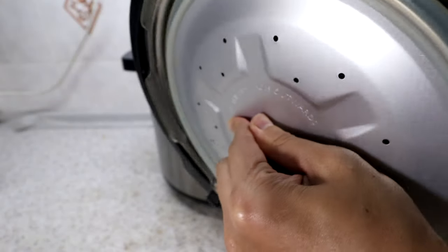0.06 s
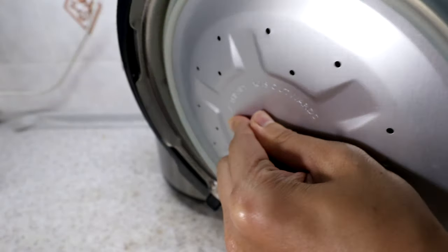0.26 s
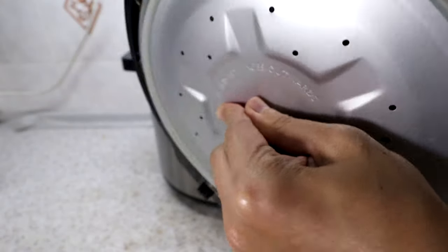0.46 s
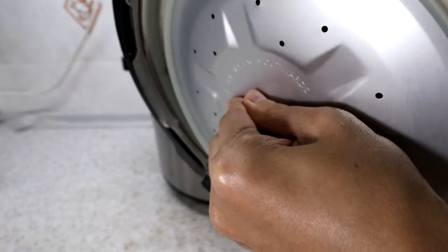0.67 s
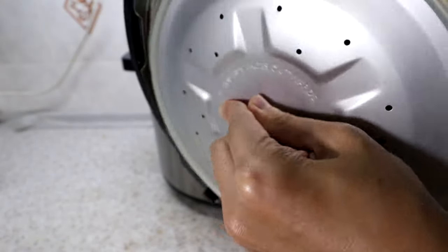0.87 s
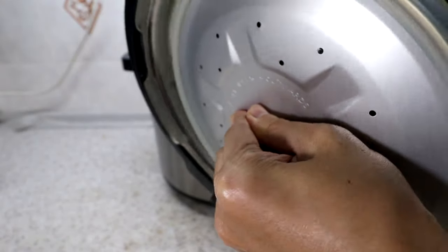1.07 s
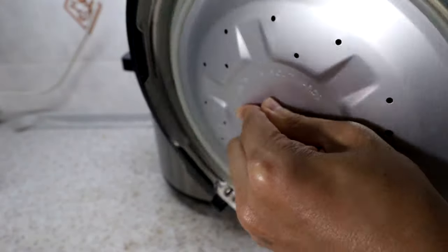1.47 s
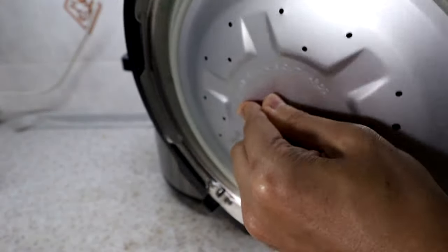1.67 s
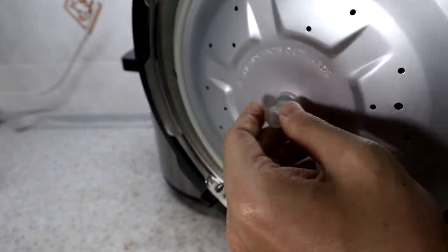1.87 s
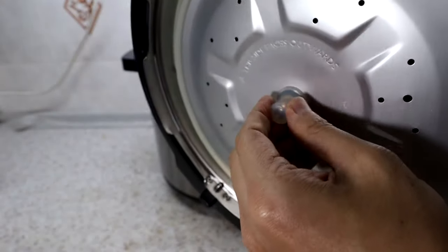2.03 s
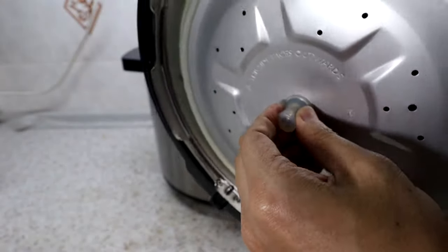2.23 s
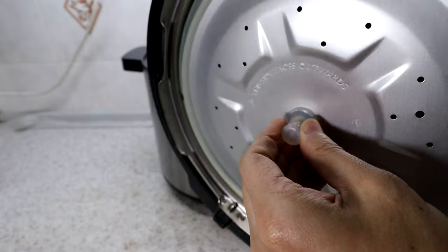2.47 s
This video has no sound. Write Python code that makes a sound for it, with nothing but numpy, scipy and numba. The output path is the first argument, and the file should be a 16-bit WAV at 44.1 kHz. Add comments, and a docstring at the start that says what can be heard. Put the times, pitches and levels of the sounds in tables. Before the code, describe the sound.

Metal lid rattling under a hand, popping off its post with a snap, then light clicks.

```python
"""First come small metal knocks and scrapes: a hand wiggles the thin inner lid of a cooker on its
centre post, and the lid rings as it hits its rim. At about 1.6 s it slips off the post with a thump
and a sharp snap, then the knob taps the post with a few lighter, drier clicks. It all happens close
to the microphones in a small, hard room with a low rumble. A limiter briefly turns the snap down."""
import sys
import numpy as np
from scipy import signal
from scipy.fft import irfft
from scipy.io import wavfile
from scipy.ndimage import uniform_filter1d
from numba import njit

SR = 44100
rng = np.random.default_rng(int(sys.argv[2]) if len(sys.argv) > 2 else 0)


def transcribe(signal):
    """Save signal, clipped to [-1, 1], as a 16-bit WAV file at the path in sys.argv[1]."""
    frames = np.atleast_2d(signal).T
    limited = np.clip(frames, -1, 1)
    pcm = np.round(limited * 32767).astype(np.int16)
    wavfile.write(sys.argv[1], SR, pcm)


N = 114660
T = np.arange(N) / SR
RING_T = T[:SR // 3]

# the lid knocking on its rim (time [s], body [dB], treble [dB], tick [dB])
LID_KNOCKS = [(.036,-37,-48,-65),(.047,-34,-61,-61),(.054,-30.5,-63,-60),(.059,-33.5,-52,-51),(.111,-21.5,-34.5,-67),(.132,-26,-43,-71),(.155,-36,-61,-71),
              (.214,-22,-35,-53),(.235,-26.5,-37,-51),(.2715,-19,-27,-42.5),(.296,-12,-17.5,-38),(.322,-22,-53,-68),(.334,-22.5,-34,-72),(.381,-28.5,-38,-46),
              (.421,-19.5,-25,-36),(.445,-33,-57,-50),(.481,-54,-58,-47),(.504,-13,-21.5,-31.5),(.511,-10,-14.5,-29.5),(.519,-16.5,-32,-33),(.527,-12.5,-22,-30),(.540,-14,-21,-35),
              (.558,-14.5,-29,-50),(.565,-18,-28,-41),(.609,-15,-21,-29.5),(.627,-23,-39,-58),(.645,-45,-57,-40),(.675,-22.5,-37,-55),(.685,-46,-43,-45),(.715,-17,-26.5,-37.5),(.737,-23.5,-34.5,-55),(.751,-28,-46,-50),
              (.799,-23,-33.5,-57),(.835,-22.5,-27,-43),(.866,-19.5,-28,-48),(.880,-27,-39,-34.5),(.8925,-12.5,-24.5,-31),(.905,-34,-42,-46),(.915,-41,-47,-53),(.939,-19.5,-36,-40),(.951,-21,-39,-52),
              (.963,-13,-26.5,-30),(.989,-22,-36,-48),(1.018,-24.5,-31,-40),(1.0248,-15.5,-33.5,-44),(1.057,-20,-40,-47),(1.066,-47,-51,-62),(1.078,-28,-39,-60),(1.084,-20.5,-43,-61),
              (1.112,-21.5,-37,-61),(1.122,-11,-15.5,-20),(1.134,-28,-37,-35),(1.156,-23,-29,-38),(1.161,-16.5,-20,-29.5),(1.176,-27,-48,-43),(1.193,-21.5,-24,-36.5),(1.211,-46,-61,-60),(1.232,-24,-35.5,-51),
              (1.346,-20,-29,-38.5),(1.405,-28.5,-50,-54),(1.437,-22,-44,-37),(1.452,-22,-30,-48),(1.463,-29,-46,-58),(1.475,-29,-51,-43),(1.494,-23,-46,-49),(1.529,-31.5,-44,-45.5),(1.567,-27,-43,-71),
              (1.792,-26,-53,-68),(1.799,-23.5,-67,-64),(2.010,-29.5,-64,-55),(2.033,-28.5,-43,-52),(2.054,-33.5,-72,-62),(2.459,-25,-38,-47),(2.471,-28.5,-43,-52)]
# the lid slipping off the post (time [s], thud [dB], body [dB], treble [dB], tick [dB])
POST_SNAPS = [(1.5885,-12.5,-17.5,-23,-30.5),(1.599,-23.5,-13,-26,-49),(1.6055,-18.5,-19,-11,-17.5),(1.615,-21.5,-7.5,-3.5,-23.5),(1.620,-23,-10.5,-17.5,-23.5),(1.625,-20,-23,-17,-46)]
# the knob tapping the post (time [s], thud [dB], body [dB], treble [dB], tick [dB])
KNOB_CLICKS = [(1.844,-36.5,-22,-31,-40),(2.1381,-55,-24.5,-29,-31.5),(2.2114,-55,-23,-27,-39),(2.3285,-23,-21,-23,-32.5),(2.425,-56,-32.5,-30.5,-40.5),(2.444,-52,-30.5,-31.5,-42),(2.512,-46,-40,-41.5,-69)]
# the tones each part rings with (pitch [Hz], level [dB], time to fade by 60 dB [s])
LID_TONES = [(318,-20.5,0.28),(382.5,-14.5,0.19),(425,-13,0.1),(507.3,-17,0.16),(643.3,-2.5,0.17),(715.3,1,0.079),(775,-5.5,0.08),(1175.4,1,0.052),(1226,4,0.029),(1296,-9.5,0.18),
             (1755,-2.5,0.027),(2800,-11,.07),(3090,-15,0.17),(3990,-11,0.057)]
POST_TONES = [(236,-9,0.038),(304,-5,0.054),(368,-3,0.037),(517,0.5,0.04),(706,10.5,0.043),(866,6,0.03),(1224,14,0.033),(1900,2.5,0.056),(3160,-5,0.013)]
KNOB_TONES = [(323.7,-4.5,0.082),(523,-4,0.028),(636,-3,0.043),(940,-4.5,0.019),(1224,-12,0.046),(2387,-7.5,0.038),(2800,-3,0.025),(3020,-3.5,0.028),(4060,-16,0.024)]
# each part's many other tones, blurred into a short clatter (frequency [Hz], level [dB])
LID_NOISE = [(60,-18),(130,-14),(240,-10),(450,-3),(720,5.5),(960,-3.5),(1250,2),(1600,-13),(2300,-15),(3200,-6.5),(4400,-12.5),(6200,-21),(7900,-22),(9000,-31),(12000,-33.5),(16000,-57)]
POST_NOISE = [(30,-13),(60,1),(150,-7),(300,0.5),(1200,1.5),(1550,-5),(2200,2.5),(3200,0.5),(4300,-6.5),(5700,-6.5),(8000,-14),(12000,-18.5),(16000,-26)]
KNOB_NOISE = [(80,-28),(200,-20),(400,-21),(650,15),(1500,-6),(3000,13),(4800,-8),(8000,-18),(12000,-29),(16000,-37)]
# how loudly the lid scrapes (time [s], level [dB])
SCRAPE_LEVELS = [(0,-41.5),(.08,-35),(.19,-47.5),(.33,-32),(.41,-42.5),(.49,-28),(.56,-33.5),(.66,-34),(.79,-42),(.93,-32),(1.1,-38.5),(1.2,-28.5),(1.33,-42.5),(1.39,-41),(1.47,-34),(1.56,-43),(1.95,-50),(2.6,-69)]
# fingers sliding on the metal (time [s], length [s], level [dB])
FINGER_RUBS = [(0.015,0.091,-47),(1.423,0.051,-37.5),(1.862,0.1,-39.5)]
# the hiss of the fingers and of the sliding lid (frequency [Hz], level [dB])
FINGER_NOISE = [(500,-20),(1800,-4),(3000,6),(4400,-6),(6000,-4),(12000,-8.5),(13500,-16),(15500,-34)]
SLIDE_NOISE = [(120,-28),(300,0),(720,4),(1000,-7),(1250,8),(1600,-7),(2200,1),(3100,-1),(4200,-29),(5700,-9),(9000,-27),(14000,-40)]
# how long the room echoes (frequency [Hz], time to fade by 60 dB [s])
ECHO_TIMES = [(100,0.51),(400,0.67),(1200,0.72),(3000,0.69),(6000,0.74),(14000,0.3)]
# the tone of the room's echo and of its low rumble (frequency [Hz], level [dB])
ECHO_NOISE = [(60, -4), (150, -4), (300, 2.5), (1000, 2.5), (3000, -2.5), (8000, -1), (15000, 2.5)]
RUMBLE_NOISE = [(20, -16), (35, -12), (50, 9), (72, -2.5), (100, 1), (160, -6.5), (350, 0), (700, -10),
                (1300, -14), (2500, -19), (6000, -37), (12000, -40), (16000, -51)]

THUD_HZ, TREBLE_HZ, TICK_HZ = 440, 1850, 5460  # borders between thud, body, treble and tick


def lid_knocks():
    """The loose lid hits its rim and rings as it is rocked."""
    out = np.zeros((2, N))
    for at, *levels in LID_KNOCKS:
        hit = ring(LID_TONES, LID_NOISE, clatter_db=7, clatter_s=0.036,
                   scatter_db=4, detune=0.0047, width=0.91)
        add(out, shape_hit(hit, [TREBLE_HZ, TICK_HZ], levels), at)
    return out


def post_snap():
    """The grommet, the ring in the lid's hole, drags over the head of the post and lets go."""
    out = np.zeros((2, N))
    for at, *levels in POST_SNAPS:
        hit = ring(POST_TONES, POST_NOISE, clatter_db=11.5, clatter_s=0.051,
                   scatter_db=2.5, detune=0.026, width=1)
        add(out, shape_hit(hit, [THUD_HZ, TREBLE_HZ, TICK_HZ], levels), at)
    return out


def knob_clicks():
    """The knob taps the post, and the fingers stop it from ringing long."""
    out = np.zeros((2, N))
    for at, *levels in KNOB_CLICKS:
        hit = ring(KNOB_TONES, KNOB_NOISE, clatter_db=-3.5, clatter_s=0.048,
                   scatter_db=3.5, detune=0.015, width=0.54)
        add(out, shape_hit(hit, [THUD_HZ, TREBLE_HZ, TICK_HZ], levels), at)
    return out


def lid_scrape(catches_per_s=260, spread_db=4, soft_hz=6000):
    """The lid sticks and slips on its rim; each tiny catch keeps it ringing."""
    catches = rng.random(N) < catches_per_s / SR
    strength = undb(spread_db * np.clip(rng.standard_normal(N), -2, 2))
    pushes = cut(catches * strength * rng.choice([-1, 1], N), soft_hz, "low", order=1)
    lid = ring(LID_TONES, LID_NOISE, clatter_db=14, clatter_s=0.065,
               scatter_db=0.5, detune=0.00067, width=0.7)
    scrape = signal.fftconvolve(pushes[None], lid, axes=1)[:, :N]
    return scrape / rms(scrape) * undb(np.interp(T, *np.array(SCRAPE_LEVELS).T))


def rubs():
    """Skin rubs on metal, and the freed lid slides along the post."""
    fingers = sum(stroke(*rub, FINGER_NOISE) for rub in FINGER_RUBS)
    return fingers + stroke(at=1.655, length=0.085, db=-28.5, colour=SLIDE_NOISE)


def stroke(at, length, db, colour, grit_db=2.5, grit_s=0.0027):
    """One rub: a hiss that swells and fades, made gritty by uneven contact."""
    grit = uniform_filter1d(rng.standard_normal(N), size=int(grit_s * SR))
    swell = np.sin(np.pi * np.clip((T - at) / length, 0, 1))
    return undb(db + grit_db * grit / rms(grit)) * swell * noise(colour, N, width=1)


def ring(modes, colour, clatter_db, clatter_s, scatter_db, detune, width, rise_s=0.00043):
    """One hit: fading tones and a short clatter. Strike and grip differ a little each time."""
    hz, db, fade_s = np.array(modes, float).T[:, :, None]
    strike, grip, side = rng.standard_normal((3, len(hz), 1))
    # high tones differ more between left and right
    stereo_phase = side * width * hz / (hz + 1500) * np.array([1, -1])[:, None, None]
    flip = np.pi * rng.integers(0, 2, (len(hz), 1))
    waves = np.sin(2 * np.pi * hz * (1 + detune * grip) * RING_T + stereo_phase + flip)
    tones = undb(db + scatter_db * strike) * fade(RING_T, fade_s) * waves
    clatter = undb(clatter_db) * noise(colour, len(RING_T), width) * fade(RING_T, clatter_s)
    return (tones.sum(axis=1) + clatter) * (1 - np.exp(-RING_T / rise_s))


def shape_hit(hit, edges, levels, start_s=0.0067):
    """The weight and hardness of a hit set how loudly each range, low to high, starts."""
    middle = [cut(hit, pair, "band", order=3) for pair in zip(edges, edges[1:])]
    bands = [cut(hit, edges[0], "low"), *middle, cut(hit, edges[-1], "high")]
    return sum(band * undb(db) / rms(band[:, :int(start_s * SR)]) for band, db in zip(bands, levels))


def room_echo(sound, echo_db, build_s):
    """The hard walls throw the sound back as a smooth, fading wash."""
    t, tail = T[:SR], 0
    hiss = noise(ECHO_NOISE, SR, width=0.96)
    edges = np.geomspace(40, 20000, 9)
    for low, high in zip(edges, edges[1:]):
        fade_s = look_up(np.sqrt(low * high), ECHO_TIMES)
        tail = tail + cut(hiss, [low, high], "band", order=3) * fade(t, fade_s)
    tail *= 1 - np.exp(-t / build_s)
    tail /= rms(tail) * np.sqrt(SR)
    return undb(echo_db) * signal.fftconvolve(sound.mean(axis=0)[None], tail, axes=1)[:, :N]


def microphones(sound, mono_below_hz=330, lag_s=0.00009, right_lead_db=2):
    """Two close microphones share the bass. The left is farther away, so it is later and weaker."""
    mid = (sound[0] + sound[1]) / 2
    side = cut((sound[0] - sound[1]) / 2, mono_below_hz, "high", order=2)
    left = np.pad(mid + side, (round(lag_s * SR), 0))[:N]
    return np.array([left * undb(-right_lead_db / 2), (mid - side) * undb(right_lead_db / 2)])


def noise(colour, size, width):
    """Stereo noise shaped by a table, alike on both sides in the bass and wider in the treble."""
    hz = np.fft.rfftfreq(size, 1 / SR)
    mid, side = np.exp(2j * np.pi * rng.random((2, len(hz)))) * undb(look_up(hz, colour))
    side = side * width * hz / (hz + 1000)
    x = irfft(np.array([mid + side, mid - side]), size)
    return x / rms(x)


def undb(db):
    """Turn decibels into a volume factor."""
    return 10 ** (np.asarray(db) / 20)


def rms(x):
    """The average strength of a signal."""
    return np.sqrt(np.mean(x ** 2)) + 1e-12


def look_up(at_hz, table):
    """Read between a table's rows, giving each octave equal space."""
    hz, value = np.array(table, float).T
    return np.interp(np.log(at_hz + 1), np.log(hz), value)


def cut(x, hz, keep, order=4):
    """Keep only the lows, the highs or a band between."""
    return signal.sosfilt(signal.butter(order, np.minimum(hz, .45 * SR), keep, fs=SR, output="sos"), x)


def fade(t, fade_s):
    """Die away by 60 dB every fade_s seconds."""
    return np.exp(-np.log(1000) * t / fade_s)


def add(out, sound, at):
    """Mix a sound in at a time in seconds."""
    start = int(at * SR)
    out[:, start:start + sound.shape[1]] += sound[:, :N - start]


@njit
def follow_peaks(x, release):
    """A level that jumps up with each peak and falls slowly."""
    out, level = np.empty(len(x)), 0.
    for i in range(len(x)):
        level = max(x[i], level * release)
        out[i] = level
    return out


def scene():
    """Lid, snap and knob with their echoes, over the room's low rumble."""
    lid = lid_knocks() + lid_scrape() + rubs()
    snap, knob = post_snap(), knob_clicks()
    echoes = (room_echo(lid, echo_db=-13.5, build_s=0.0016)
              + room_echo(snap, echo_db=-12, build_s=0.015)
              + room_echo(knob, echo_db=-10.5, build_s=0.004))
    rumble = undb(-42.5) * noise(RUMBLE_NOISE, N, width=1)
    return microphones(lid + snap + knob + echoes) + rumble


def record(dry, soften_hz=13600, limit_db=-2, release_s=0.059, top_hz=16000):
    """The microphones soften the highs, a limiter eases loud peaks down, and the very top is cut."""
    heard = cut(dry, soften_hz, "low", order=3)
    peak = follow_peaks(np.abs(heard).max(axis=0), np.exp(-1 / (release_s * SR)))
    gain = np.minimum(1, undb(limit_db) / (peak + 1e-9)) ** 0.46  # takes off about half the excess dB
    limited = np.clip(heard * uniform_filter1d(gain, size=64), -1, 1)
    return signal.sosfilt(signal.ellip(8, .2, 70, top_hz, fs=SR, output="sos"), limited)


dry = scene()
out = record(dry)
transcribe(out)
```